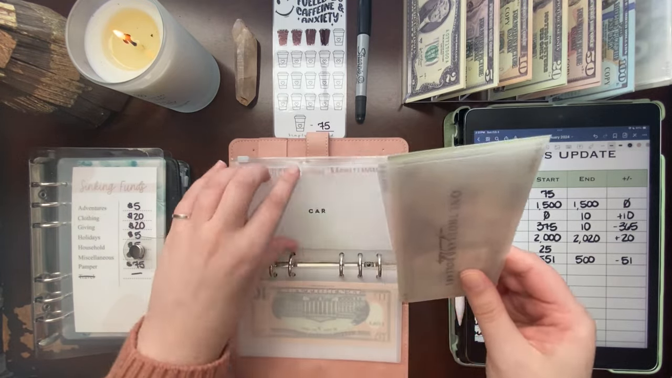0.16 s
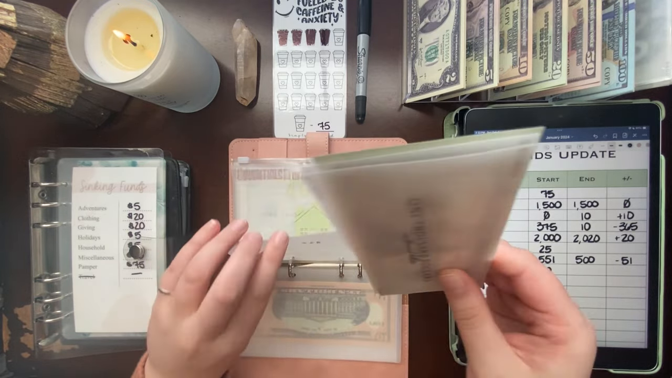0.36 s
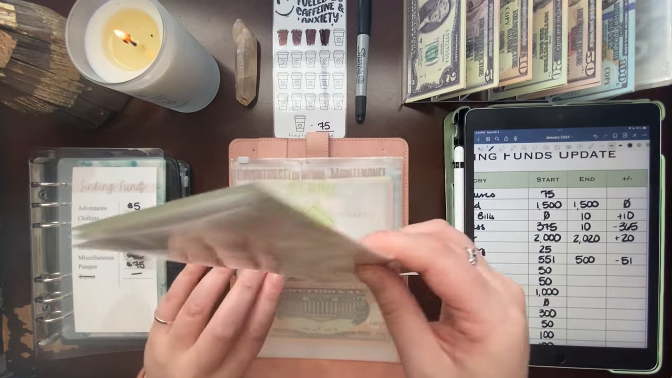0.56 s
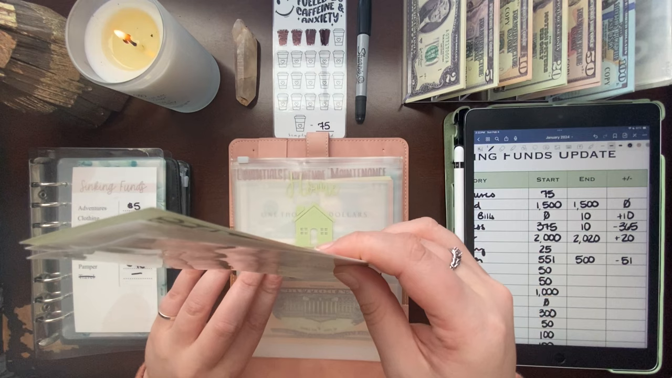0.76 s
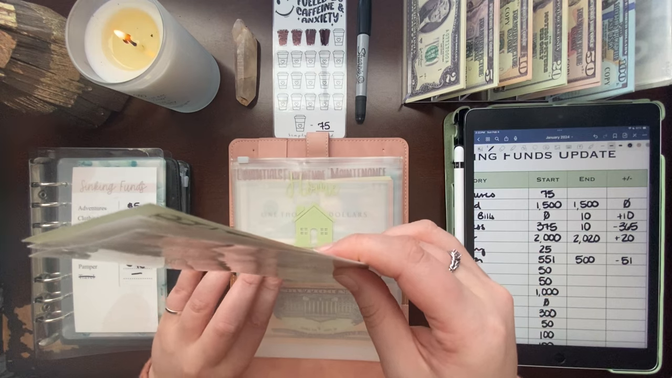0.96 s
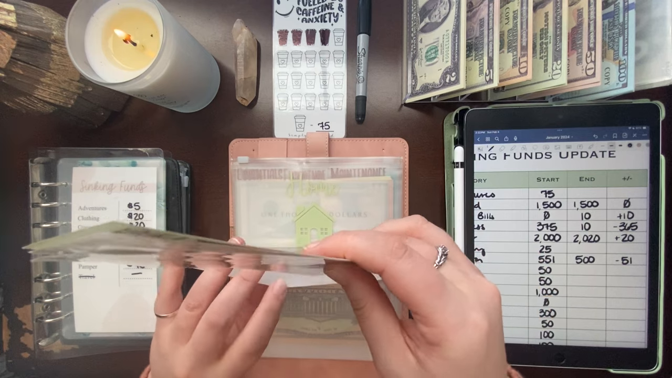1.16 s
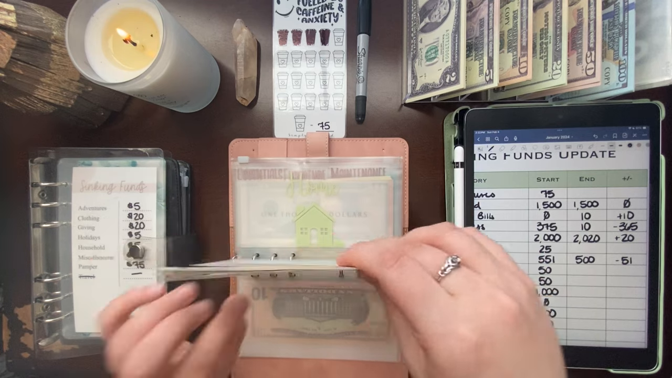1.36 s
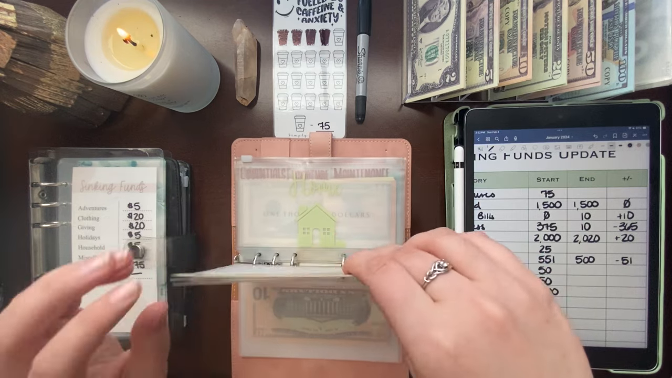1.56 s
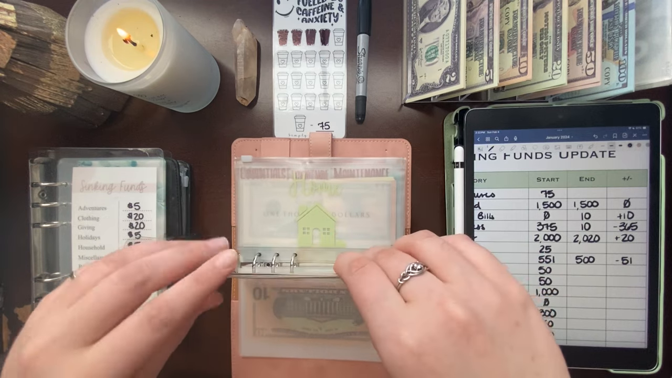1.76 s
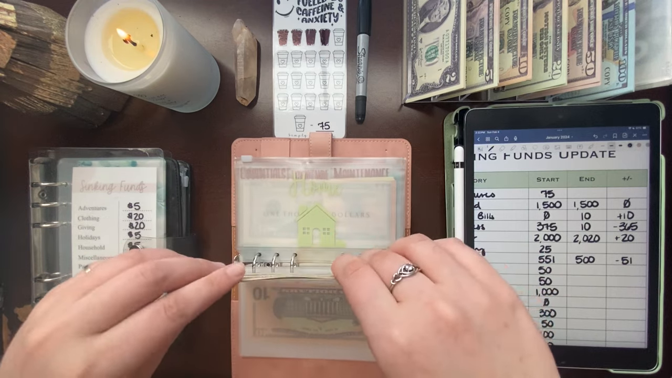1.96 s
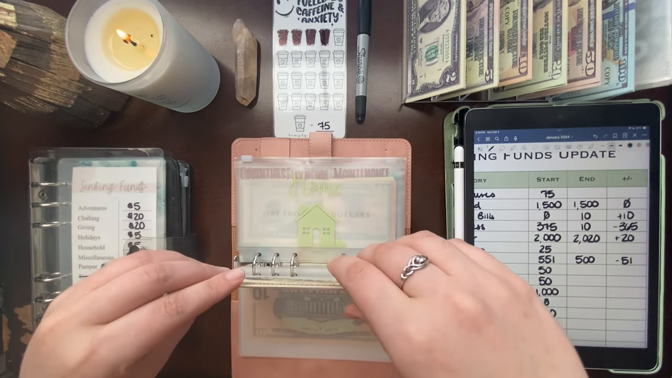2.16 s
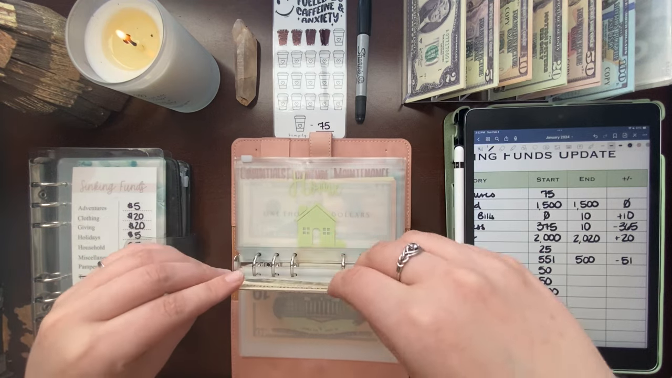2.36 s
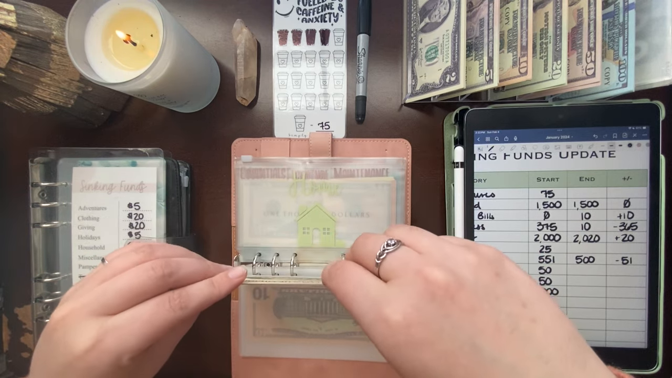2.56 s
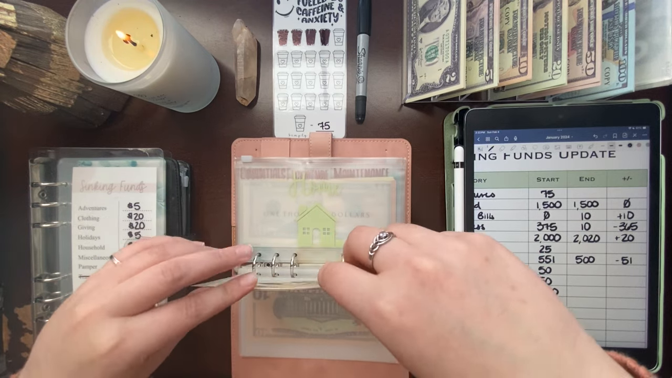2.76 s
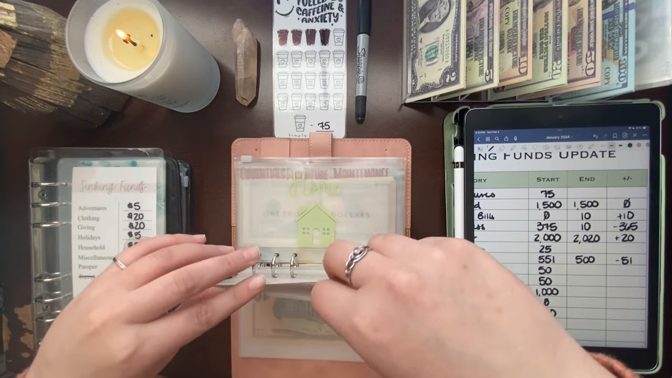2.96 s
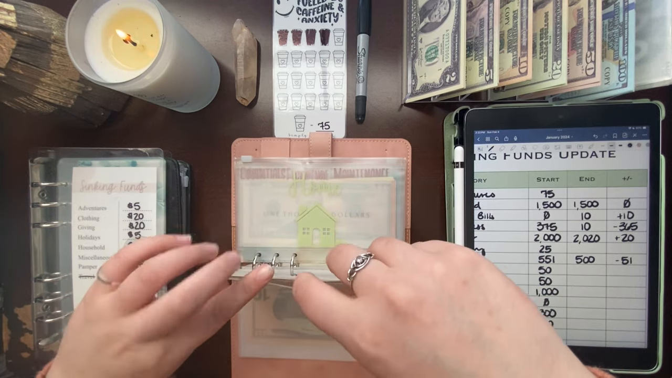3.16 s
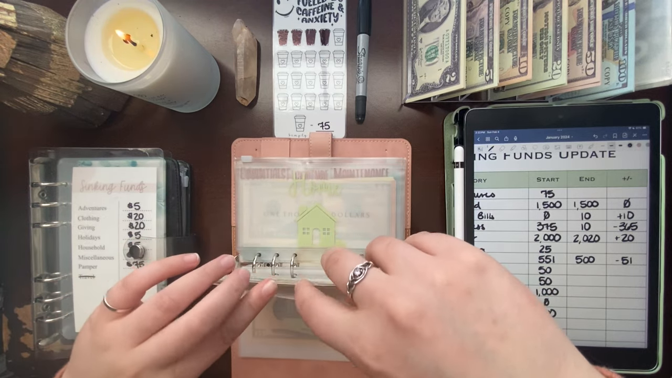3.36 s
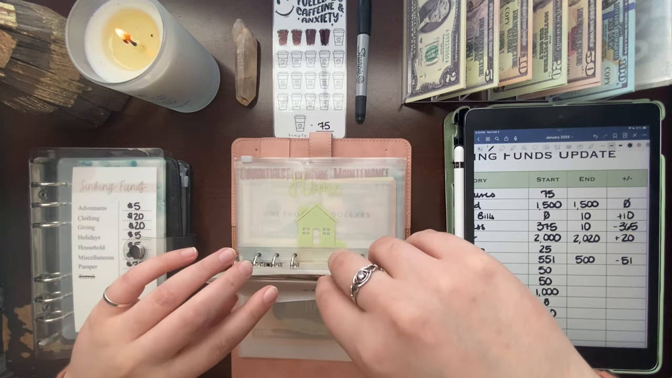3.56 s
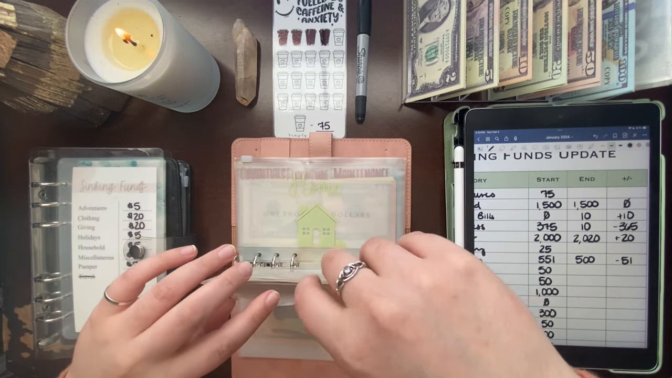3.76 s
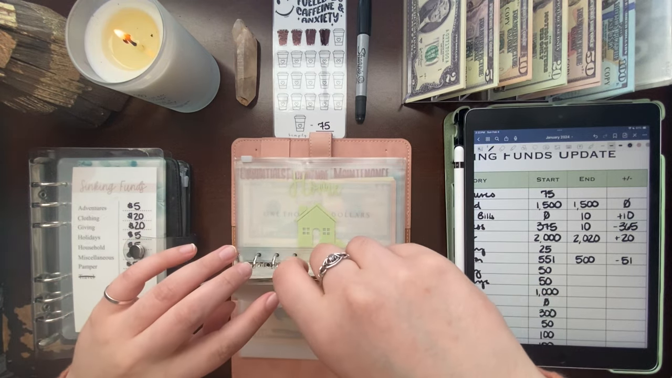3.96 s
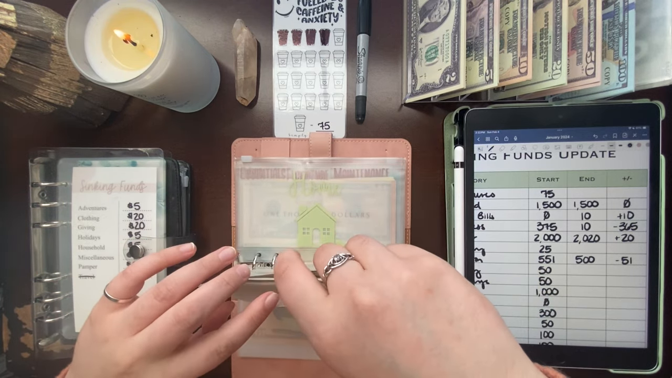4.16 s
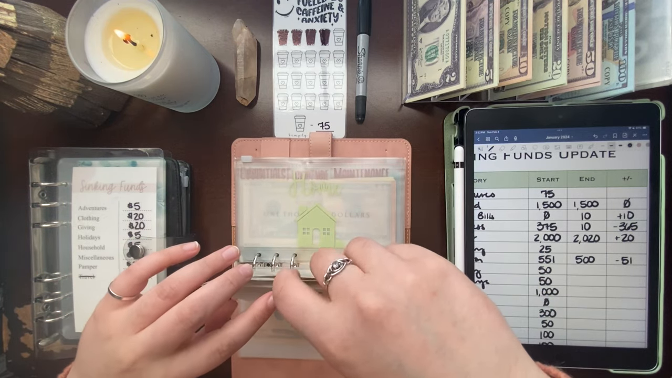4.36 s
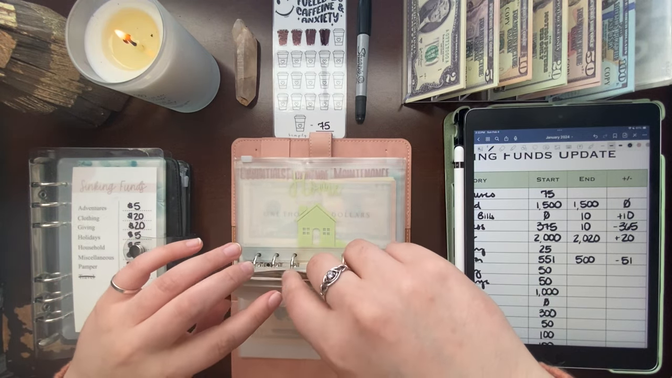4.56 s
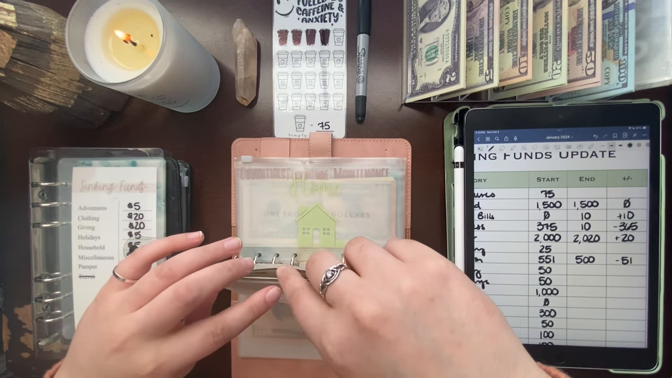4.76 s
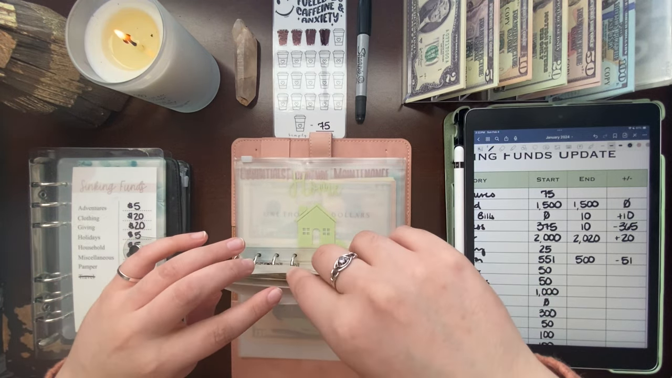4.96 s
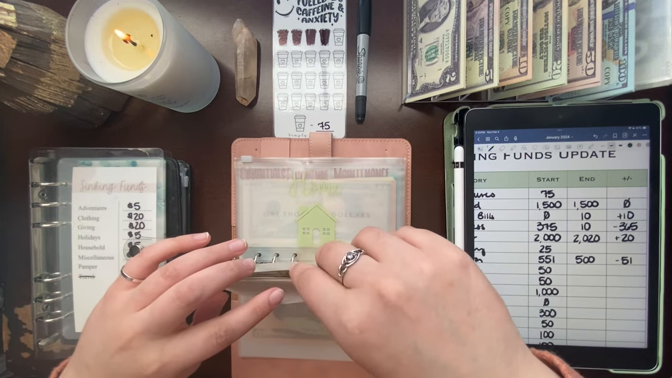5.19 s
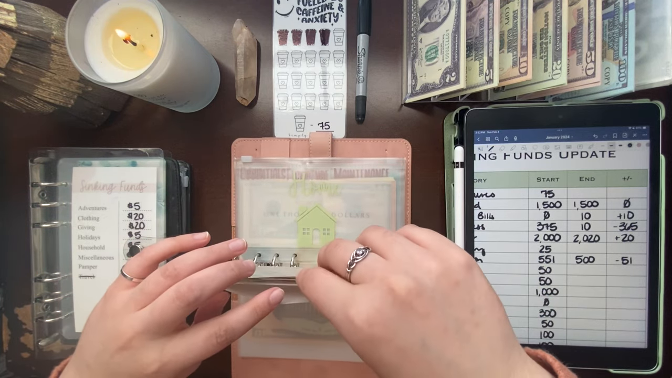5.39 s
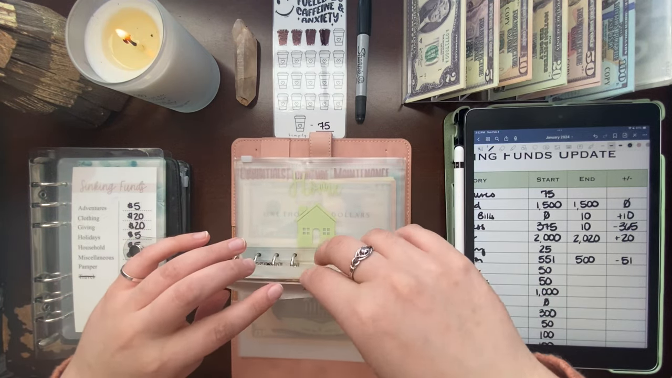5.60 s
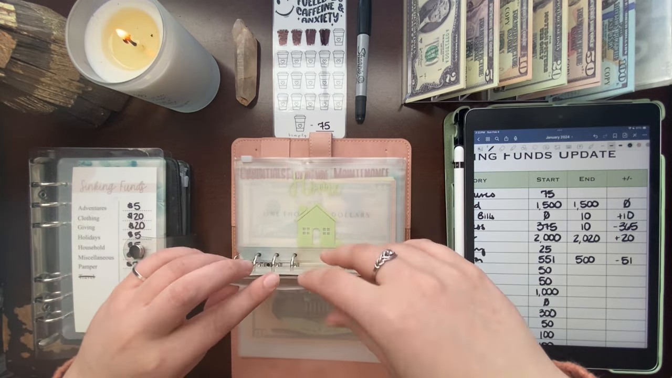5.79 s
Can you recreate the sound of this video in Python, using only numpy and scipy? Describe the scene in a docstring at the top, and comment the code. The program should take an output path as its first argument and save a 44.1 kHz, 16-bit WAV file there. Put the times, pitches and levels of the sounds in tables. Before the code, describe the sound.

In a small, quiet room, close to the microphone, hands flip the stiff plastic pouches of a ring binder. Two bursts of flapping and clicking come with soft thumps and a brief swish of sliding plastic. After faint rubbing, a crisp snap and a dull knock of the binder against the desk stand out. Then the pouches are pinched and fingered softly, with scattered ticks over a steady faint hiss.

```python
"""Stiff clear plastic pouches are handled in a ring binder on a desk, in a small quiet room with mic hiss.
For the first second and a half the sheets are turned over: they slap and tick against each other in two
flurries while the stack bumps softly. Then they slide with a hiss. Near three seconds an edge snaps free
and the binder knocks on the desk. After that the pouches are pinched and fingered in short, quiet strokes."""
import sys
import numpy as np
from scipy import signal
from scipy.fft import rfft, irfft
from scipy.io import wavfile

SR = 44100
rng = np.random.default_rng(int(sys.argv[2]) if len(sys.argv) > 2 else 0)


def pcm_store(signal):
    """Save signal as 16-bit PCM."""
    levels = np.round(np.clip(np.atleast_2d(signal), -1, 1) * 32767)
    wavfile.write(sys.argv[1], SR, levels.astype(np.int16).T)


N = 257230

# Room rumble and microphone hiss. Each row: frequency in Hz, relative level in dB.
FLOOR_SPECTRUM = [(12, -42), (20, 6.5), (162, -3), (192, -4), (233, -2.5), (292, -5), (570, -9.5),
                  (819, -11.5), (891, -10), (1050, -14.5), (1250, -15.5), (1740, -16), (3910, -19),
                  (4370, -20), (15800, -22)]
# The room's decay. Each row: frequency in Hz, time to fall 60 dB in seconds.
ROOM_DECAY = [(100, 0.57), (500, 0.18), (2000, 0.3), (6000, 0.23), (15000, 0.035)]

# Tone colours of the parts that sound. Each row: frequency in Hz, relative level in dB.
STACK_EQ = [(50, -30.5), (120, -11.5), (190, 3), (260, -0.5), (330, -13), (430, 0), (600, -24), (1500, -51)]  # low thump of the whole stack
PANEL_EQ = [(150, -32), (330, -7.5), (440, 2), (620, 6), (800, -1), (1000, -1.5), (1250, 1), (1680, -3.5),
            (2050, -10), (2600, -24), (5000, -39)]  # midrange flap of a pouch's face
EDGE_EQ = [(1200, -37.5), (2100, -9), (2500, 4), (2800, 1.5), (3150, 4), (4050, -1), (4700, -1),
           (5500, -6.5), (8000, -14.5)]  # bright clack of its stiff edge
FILM_EQ = [(3000, -58), (5500, -7.5), (6600, -4), (7300, -3), (8200, -0.5), (9800, 2), (11000, 0.5),
           (12500, 2.5), (13800, -3), (15500, -22)]  # crisp top of the snapping film
SLIDE_EQ = [(1500, -16), (2800, -1.5), (4600, 1.5), (5600, -4), (7400, -0.5), (8600, 3), (10400, 0),
            (12200, 3.5), (13600, -5), (15500, -12)]  # airy hiss of sliding plastic
DESK_EQ = [(30, -16), (65, 1), (130, -8.5), (240, 3), (330, -12), (430, 2.5), (850, 4.5), (1100, -10),
           (1750, -15), (2100, -16), (2500, -16), (5000, -27)]  # dull thud of the binder on the desk

# The whole stack is set down or pressed. Each row: time in seconds, thump level in dB.
STACK_BUMPS = [(0.038, -44), (0.843, -46), (1.087, -39.5), (1.096, -47), (1.319, -32), (1.398, -46),
               (1.4425, -38.5), (1.542, -40), (1.56, -42), (1.597, -40.5), (1.617, -36), (2.9179, -31),
               (5.057, -45.5), (5.471, -44), (5.741, -45.5)]
# Plastic slides on plastic or skin. Each row: crest time in seconds, length in seconds, level in dB,
# grip from 0 to 1, pressure on the panel from 0 to 1.
STROKES = [(0.153, .1, -61.5, 0.02, 0.2), (1.282, 0.076, -38.5, 0.51, 0.68),
           (1.322, 0.068, -40.5, 0.58, 0.68), (1.347, .036, -38.5, 0.08, .02), (1.355, .028, -47, 0.8, 0.6),
           (1.441, 0.087, -46.5, .5, 0.4), (1.652, 0.069, -45.5, 0.79, 0.24), (1.92, .29, -53, .62, 0.4),
           (2.068, .085, -51, 0.68, .25), (2.66, .17, -52, 0.64, 0.4), (2.686, .034, -42.5, 0.42, 0),
           (2.741, 0.092, -51, 0.5, 0.8), (2.811, 0.068, -45.5, 0.38, 0.63), (2.87, .056, -54, 0.53, .95),
           (3.019, 0.16, -52, 0.5, 0.81), (3.353, 0.071, -55, 0.57, 0.6), (3.573, 0.073, -56.5, .5, 0.85),
           (3.864, 0.045, -54.5, 0.4, .4), (3.91, .05, -57.5, 0.46, 1), (3.948, .065, -54, 0.33, 0.74),
           (4.15, .064, -52, 0.43, 0), (4.563, 0.12, -61, 0.53, 0.66), (4.691, 0.042, -56.5, .3, 0.88),
           (4.747, .043, -50, 0.39, .1), (4.91, .11, -60.5, 0.74, 0.84), (5.382, .08, -54.5, 0.47, .55),
           (5.475, .12, -52.5, 0.63, 0.93), (5.75, .07, -54.5, 0.62, .5), (5.82, .08, -56, 0.35, .5)]
# The binder hits the desk. Each row: start in seconds, ring level in dB, thud level in dB,
# contact time in seconds.
DESK_KNOCKS = [(2.9209, -28.5, -25, 0.00051), (2.9309, -23.5, -26, 0.00029)]
# Binder and desk ring together. Each row: frequency in Hz, relative level in dB,
# time to fall 60 dB in seconds.
BINDER_MODES = [(170, -9, 0.13), (209, -13, 0.11), (260, -5, 0.079), (436, 2, 0.074), (641, 1, 0.1),
                (800, -3, 0.023), (850, 0, 0.05), (897, 5.5, 0.037), (1180, 4, 0.029), (1290, -14, .04),
                (1660, -4, 0.043), (1800, -12, 0.049), (2437, -2.5, 0.043)]
# A free pouch slaps or buckles. Each row: time in seconds, flap level in dB, hardness from 0 to 1,
# panel pitch in Hz, edge pitch in Hz.
POUCH_SLAPS = [(0.126, -47.5, 0.69, 640, 3920), (0.3395, -43, 0, 1030, 2400), (0.3655, -37, .42, 960, 2570),
               (0.3692, -34.5, 0.71, 885, 2490), (0.402, -39, 0.47, 714, 2600),
               (0.4552, -39, .25, 640, 2600), (0.474, -38, 0, 985, 3000), (0.4863, -25, 0.13, 590, 3140),
               (0.5024, -30, 0.42, 570, 3220), (0.515, -39.5, 0.32, 790, 3120),
               (0.524, -39, 0.28, 1050, 2500), (1.022, -42.5, 0.25, 840, 2400),
               (1.0529, -33.5, 0.57, 920, 3300), (1.0636, -33, 0.45, 1200, 3540),
               (1.076, -33, 0.1, 1290, 4300), (1.125, -35, 0.02, 1380, 3500),
               (1.16, -37.5, 0.53, 734, 3220), (1.2591, -32.5, .45, 730, 3870),
               (1.294, -40, 0.78, 1070, 2500), (1.3837, -47.5, 0.64, 1370, 3700),
               (1.4372, -35, 0.2, 840, 3530), (2.184, -54, .66, 690, 3240), (2.596, -51, 0.68, 735, 4500),
               (2.843, -49.5, 0.55, 1160, 3500), (2.9154, -37.5, 1, 760, 4090),
               (3.034, -46.5, 0.72, 760, 3620), (3.16, -46.5, 0.48, 714, 2680),
               (3.294, -44, 0.59, 654, 3900), (3.409, -34.5, 0.41, 870, 4020),
               (3.4934, -43, 0.63, 615, 3920), (4.225, -53.5, .55, 1090, 3200),
               (4.268, -47, .6, 1300, 2880), (5.463, -40.5, 0.52, 880, 2600),
               (5.741, -45.5, 0.52, 580, 3760)]

HIT_TIME = np.arange(8192) / SR  # time axis of one hit, in seconds
LEAD_IN_SAMPLES = SR // 125  # 8 ms of swelling noise ahead of a hit
EDGE_RING_HZ, EDGE_WIDTH_HZ = 3713, 1470  # the edge's typical pitch, and its bandwidth with no grip


def amp(db):
    """Decibels to gain."""
    return 10 ** (np.asarray(db) / 20)


def unit_rms(x):
    """Scales to rms 1."""
    return x / np.sqrt(np.mean(x ** 2) + 1e-20)


def unit_hit(x):
    """Scales a short sound to the energy of 10 ms at rms 1."""
    return x / np.sqrt(np.sum(x ** 2) / (SR / 100) + 1e-20)


def curve_at(points, hz):
    """Reads a table on a log-frequency axis."""
    freqs, values = np.transpose(points)
    return np.interp(np.log(hz + 1), np.log(freqs + 1), values)


def add(mix, start, sound):
    """Mixes a sound in at a start time in seconds."""
    part = mix[max(round(start * SR), 0):][:len(sound)]
    part += sound[:len(part)]


def colour(x, eq):
    """Minimum-phase EQ: it rings after a click, never before."""
    log_gain = curve_at(eq, abs(np.fft.fftfreq(2048, 1 / SR))) * np.log(10) / 20
    response = np.fft.ifft(np.exp(np.conj(signal.hilbert(log_gain)))).real
    return signal.fftconvolve(x, response)[:len(x)]


def resonate(x, hz, width_hz):
    """One band-pass resonance."""
    r = np.exp(-np.pi * width_hz / SR)
    return signal.lfilter([1, 0, -1], [1, -2 * r * np.cos(2 * np.pi * hz / SR), r * r], x)


def pitched(x, hz, width_hz, ring):
    """Gives a hit a pitch by blending in one resonance."""
    return unit_hit(unit_hit(x) + ring * unit_hit(resonate(x, hz, width_hz)))


def noise_floor():
    """The bed: steady room rumble and microphone hiss."""
    gain = amp(curve_at(FLOOR_SPECTRUM, np.fft.rfftfreq(N, 1 / SR)))
    return amp(-50) * unit_rms(irfft(rfft(rng.standard_normal(N)) * gain, N))


def room_reverb(x):
    """The small room answers with a short diffuse tail whose top dies first."""
    t = np.arange(SR // 2) / SR
    hz, frame_times, spectra = signal.stft(rng.standard_normal(len(t)), SR, nperseg=256)
    decay = amp(-60 * frame_times / curve_at(ROOM_DECAY, hz)[:, None])
    tail = signal.istft(spectra * decay, SR, nperseg=256)[1][:len(t)]
    tail *= np.clip((t - 0.003) / 0.014, 0, 1)  # pre-delay, then fade-in
    return signal.fftconvolve(x, tail / np.linalg.norm(tail))[:N]


def slips(size, per_s, spread_db):
    """Friction: a train of tiny slips of uneven strength."""
    strength = amp(spread_db * np.minimum(rng.exponential(1, size), 4))
    return strength * rng.choice([-1, 1], size) * (rng.random(size) < per_s / SR)


def fingering():
    """Held sheets never rest: faint scattered ticks and soft pats."""
    ticks = slips(N, per_s=110, spread_db=2)
    pats = slips(N, per_s=45, spread_db=4)
    panel = unit_rms(colour(ticks + pats, PANEL_EQ))
    edge = unit_rms(colour(ticks, EDGE_EQ))
    return amp(-65) * panel + amp(-68) * edge


def contact(t60, rattle):
    """A sudden push followed by a dying rattle of the sheet."""
    chatter = rng.standard_normal(len(HIT_TIME)) * amp(-60 * HIT_TIME / t60)
    return unit_hit(signal.unit_impulse(len(HIT_TIME))) + rattle * unit_hit(chatter)


def lead_in(hit, db):
    """A short swell of noise leads into each hit and softens its attack."""
    swell = np.linspace(0, 1, LEAD_IN_SAMPLES) ** 2 * rng.standard_normal(LEAD_IN_SAMPLES)
    return np.concatenate([amp(db) * unit_hit(swell), unit_hit(hit)])


def landing(thump_db, flap_db, clack_db, snap_db, panel_hz, edge_hz):
    """One hit in four layers: the stack thumps, the panel flaps, its edge clacks, the film snaps."""
    stack = colour(lead_in(contact(t60=0.12, rattle=1), db=-10.5), STACK_EQ)
    panel = colour(lead_in(contact(t60=0.032, rattle=3.7), db=-12.5), PANEL_EQ)
    edge = colour(lead_in(contact(t60=0.032, rattle=2.7), db=-14), EDGE_EQ)
    # the film cracks within a millisecond or two, then buzzes
    crack = contact(t60=0.0047, rattle=3.5) + 0.58 * contact(t60=0.042, rattle=5.5)
    film = colour(lead_in(crack, db=-24), FILM_EQ)
    return (amp(thump_db) * unit_hit(stack)
            + amp(flap_db) * pitched(panel, panel_hz, width_hz=240, ring=1)
            + amp(clack_db) * pitched(edge, edge_hz, width_hz=150, ring=0.82)
            + amp(snap_db) * pitched(film, hz=8170, width_hz=1200, ring=0.36))


def stack_bumps():
    """The whole stack lands softly: mostly thump, with a little of the top pouch."""
    out = np.zeros(N)
    for time, db in STACK_BUMPS:
        bump = landing(thump_db=db, flap_db=db - 3, clack_db=db - 15, snap_db=db - 18,
                       panel_hz=570, edge_hz=EDGE_RING_HZ)
        add(out, time - LEAD_IN_SAMPLES / SR, bump)
    return out


def uneven_grip(size, per_s, depth_db):
    """The plastic catches and lets go: a gain that wanders at random."""
    knots = rng.standard_normal(256)
    return amp(depth_db * np.interp(np.arange(size) / SR * per_s, np.arange(len(knots)), knots))


def rub(rise_s, fall_s, flutter_db, ring_db, hiss_db, ring_hz, width_hz):
    """One stroke swells and fades; its slips shake the panel, ring the stiff edge and hiss."""
    t = np.arange(-rise_s, fall_s, 1 / SR)
    swell = np.interp(t, [-rise_s, 0, fall_s], [0, 1, 0])
    speed = swell * uneven_grip(len(t), per_s=180, depth_db=2.35)
    flutter = colour(slips(len(t), per_s=1500, spread_db=2), PANEL_EQ)
    edge = colour(slips(len(t), per_s=2500, spread_db=0.5), EDGE_EQ)
    hiss = colour(slips(len(t), per_s=2000, spread_db=2), SLIDE_EQ)
    layers = (flutter_db, flutter), (ring_db, resonate(edge, ring_hz, width_hz)), (hiss_db, hiss)
    return speed * sum(amp(db) * unit_rms(layer) for db, layer in layers)


def sliding_strokes():
    """Pouches slide: grip trades hiss for a narrow edge ring, pressure shakes the panel."""
    out = np.zeros(N)
    for crest, length, db, grip, pressure in STROKES:
        rise_s = 0.47 * length
        grip_db = 18 * (grip - 0.5)
        ring_hz = EDGE_RING_HZ * (0.095 / length) ** 0.089  # slower strokes ring lower
        width_hz = EDGE_WIDTH_HZ * np.exp(-1.6 * grip)  # grip tightens the ring towards a squeak
        stroke = rub(rise_s, length - rise_s, flutter_db=db - 14.5 + 22 * pressure, ring_db=db + grip_db,
                     hiss_db=db + 2.7 - grip_db, ring_hz=ring_hz, width_hz=width_hz)
        add(out, crest - rise_s, stroke)
    return out


def binder_knocks():
    """The binder lands in a quick double knock, thud plus ring; a shorter contact wakes higher modes."""
    out = np.zeros(N)
    attack = 1 - np.exp(-HIT_TIME / 0.0011)  # the padded cover gives way first
    for start, ring_db, thud_db, contact_s in DESK_KNOCKS:
        ring = np.zeros(len(HIT_TIME))
        for hz, db, t60 in BINDER_MODES:
            envelope = amp(db - 60 * HIT_TIME / t60) / (1 + (hz * contact_s) ** 2)
            ring += envelope * np.sin(2 * np.pi * hz * HIT_TIME)
        thud = colour(contact(t60=0.032, rattle=4.8), DESK_EQ)
        add(out, start, amp(ring_db) * unit_hit(ring * attack) + amp(thud_db) * unit_hit(thud * attack))
    return out


def pouch_slaps():
    """Single pouches slap, barely moving the stack; harder contacts bring out the edge and the film."""
    out = np.zeros(N)
    rise_s = 0.015
    for time, db, hardness, panel_hz, edge_hz in POUCH_SLAPS:
        slap = landing(thump_db=db - 13, flap_db=db, clack_db=db - 18 + 22.5 * hardness,
                       snap_db=db - 28 + 39.5 * hardness, panel_hz=panel_hz, edge_hz=edge_hz)
        add(out, time - LEAD_IN_SAMPLES / SR, slap)
        # around each slap the pouch shivers against its neighbour
        shiver = rub(rise_s, fall_s=0.04, flutter_db=db - 12.5, ring_db=db - 23, hiss_db=db - 31,
                     ring_hz=edge_hz, width_hz=EDGE_WIDTH_HZ)
        add(out, time - rise_s, shiver)
    return out


def scene():
    """The mono mix: the handled binder up close, a touch of room, the noise bed underneath."""
    binder = pouch_slaps() + stack_bumps() + sliding_strokes() + binder_knocks() + fingering()
    return (binder + amp(-16) * room_reverb(binder) + noise_floor())[None]


def record(dry):
    """The recorder's band limit: a steep low-pass at 15.9 kHz."""
    low_pass = signal.firwin(511, 15900, window=("kaiser", 9), fs=SR)
    return signal.oaconvolve(dry, low_pass[None], "same")


dry = scene()
out = record(dry)
pcm_store(out)
```